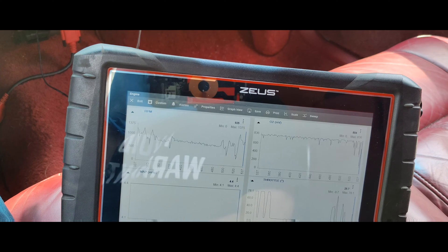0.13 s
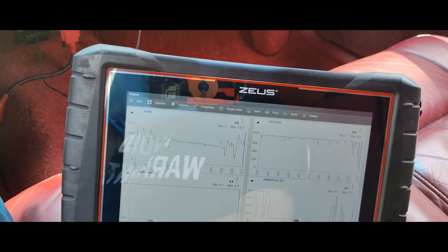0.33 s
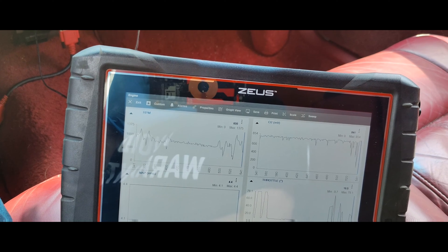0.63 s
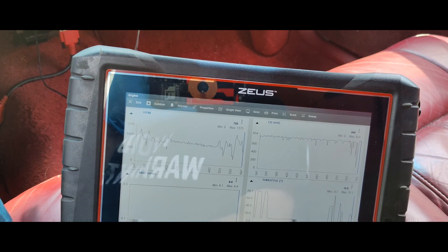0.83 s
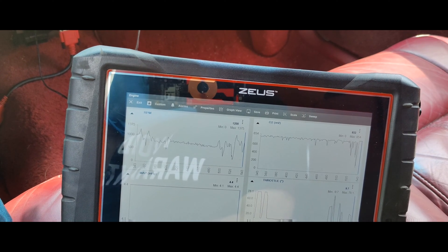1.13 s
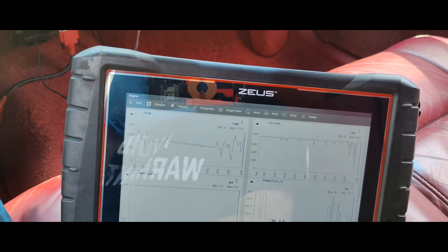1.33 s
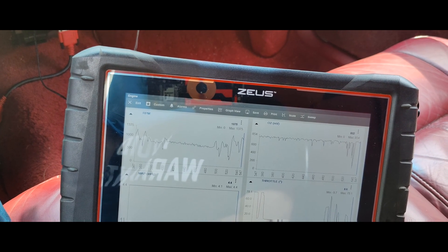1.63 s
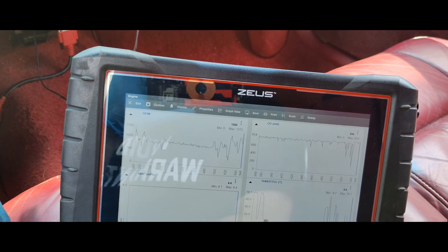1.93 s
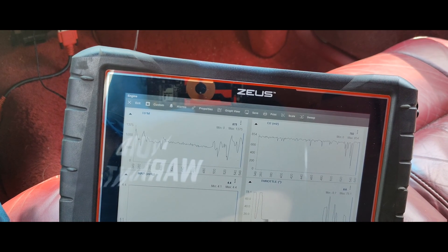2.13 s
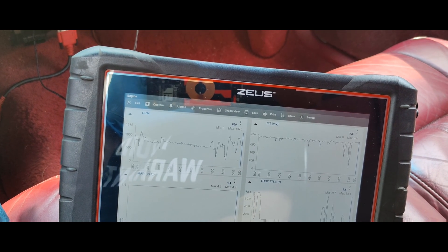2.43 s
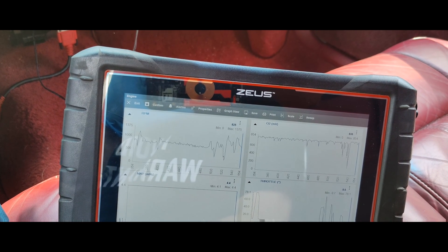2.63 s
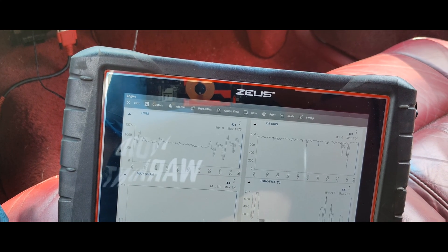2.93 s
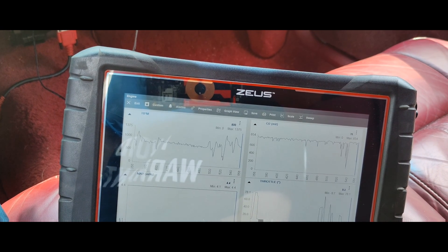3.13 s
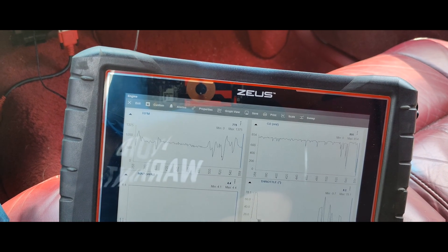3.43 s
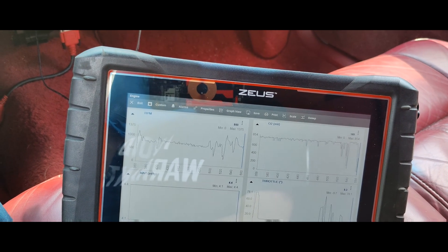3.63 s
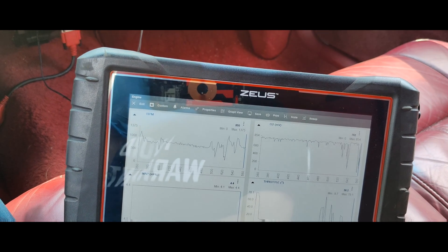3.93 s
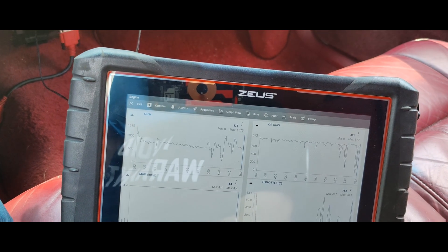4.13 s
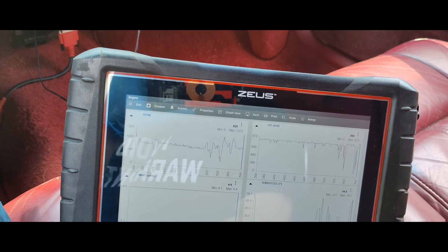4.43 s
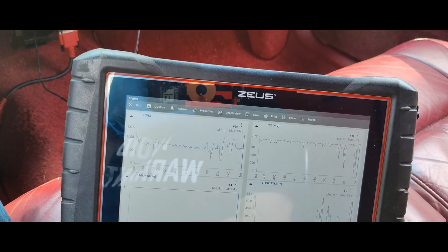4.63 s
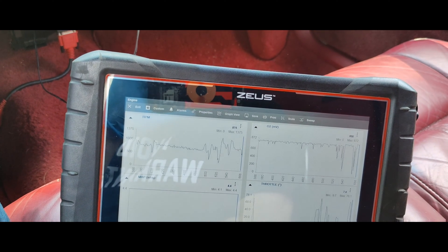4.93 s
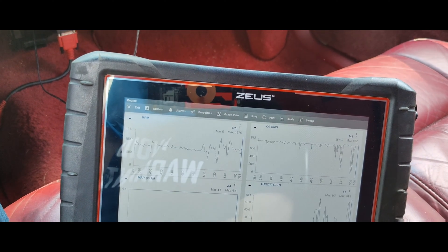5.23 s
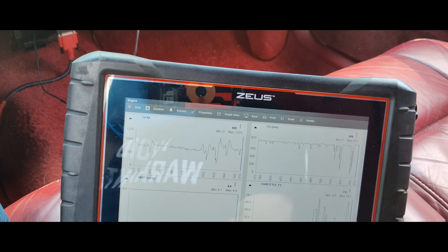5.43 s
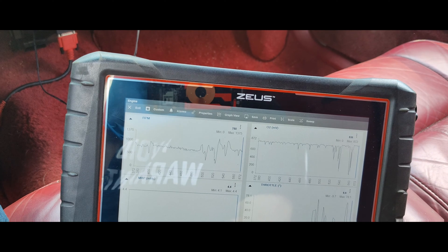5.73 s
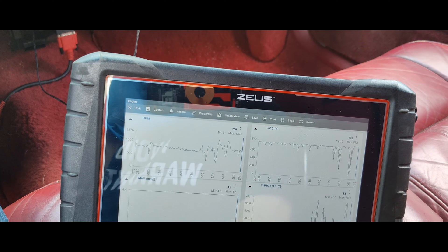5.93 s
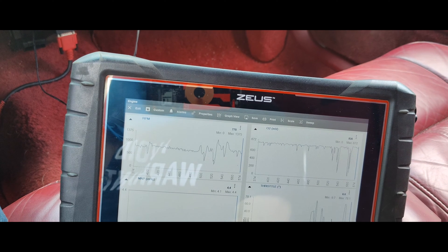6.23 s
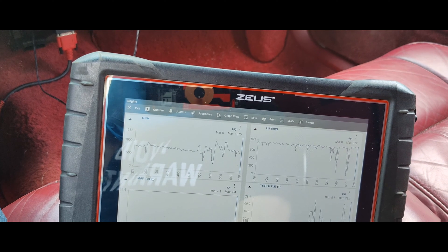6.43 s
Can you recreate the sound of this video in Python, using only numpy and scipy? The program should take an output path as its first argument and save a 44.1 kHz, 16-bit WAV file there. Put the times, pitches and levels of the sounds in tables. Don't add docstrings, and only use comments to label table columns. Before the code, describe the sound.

Inside a closed car, a large eight-cylinder petrol engine booms deeply and roughly, sagging nearly to a stall within half a second. It kicks, catches and revs up slightly, then settles to a quiet, lumpy idle. Past the middle it surges loudly for under a second, stumbles and settles again. Low mechanical roar leans left, faint intake hiss lies ahead, a trim panel hums in spells and tiny trim pieces tick. Stereo microphone at the seat.

```python
import sys
import numpy as np
from scipy import signal
from scipy.fft import rfft, irfft
from scipy.io import wavfile
from scipy.ndimage import uniform_filter1d

SR = 44100
rng = np.random.default_rng(int(sys.argv[2]) if len(sys.argv) > 2 else 0)


def boost_factor(decibels):
    exponent = np.asarray(decibels, float) / 20
    return 10 ** exponent


def store_wav(level_fs):
    pcm = np.round(np.clip(np.atleast_2d(level_fs), -1, 1) * 32767)
    wavfile.write(sys.argv[1], SR, pcm.T.astype(np.int16))


N = 289737
T = np.arange(N) / SR


def evened(x):
    return x / np.sqrt(np.mean(x ** 2) + 1e-20)


def smoothed(x, size):
    return uniform_filter1d(uniform_filter1d(x, size=size), size=size)


def read(points, hz):
    f, value = np.transpose(points)
    return np.interp(np.log(hz + 1), np.log(f + 1), value)


def curves(rows):
    s, *columns = np.transpose(rows)
    return [np.interp(T, s, column) for column in columns]


def bump(s, length):
    return np.exp(-((T - s) / length * 2) ** 2)


def gate(s, length, edge_s):
    return np.clip(np.minimum(T - s, s + length - T) / edge_s + .5, 0, 1)


def ports(x, lead_s, left_db):
    late = np.interp(T - lead_s, T, x)
    return np.array([x * boost_factor(left_db / 2), late / boost_factor(left_db / 2)])


# (time [s], firing rate [Hz])
SPEED = [(0, 65.4), (.3, 42.08), (.6, 27.74), (.82, 51.17), (.93, 46.92), (1.15, 52.73), (1.32, 71.76),
         (1.48, 76.6), (2.0, 61.53), (2.45, 56.28), (3.64, 55.48), (3.92, 60.18), (4.32, 51.9),
         (4.55, 44.36), (4.88, 61.47), (5.36, 55.68), (5.6, 51), (6.57, 49.94)]


def crank():
    hz, = curves(SPEED)
    turns = np.cumsum(hz) / SR
    weak_s = 2.545
    return hz, turns - turns[round(weak_s * SR)]


# (time [s], force [dB], sharpness of each push [dB], unevenness of cylinders [dB])
LOAD = [(0, -21, -8.5, -42), (.11, -17, -14.5, -29.5), (.27, -28, -4.5, -24.5), (.46, -30.5, -5.5, -30.5),
        (.68, -30.5, -6, -34.5), (.99, -44, -3, -32), (1.5, -41, -2, -32.5), (1.72, -32, -22, -33),
        (3.6, -33, -25, -32), (3.66, -16.5, -12.5, -28), (3.92, -15, -17, -26.5), (4.33, -16.5, -6, -30.5),
        (4.41, -21, -20, -27), (4.55, -33, -11, -32), (4.88, -34, -18, -31), (5.36, -36.5, -22, -31.5),
        (5.56, -28, -17, -37.5), (6.57, -30, -30, -33)]
# (time [s], length [s], force [dB])
CATCHES = [
    (0.341, 0.072, -21.5),
    (0.738, 0.025, -22),
    (0.808, 0.041, -20),
    (0.916, 0.066, -21.5),
    (4.479, 0.042, -19),
    (4.628, 0.069, -24),
    (5.749, 0.12, -30.5),
    (6.148, .06, -28.5),
    (6.45, .1, -31),
]
# (time [s], length [s], dip [dB])
MISSES = [
    (3.761, .04, -3),
    (4.41, 0.039, -2.5),
    (4.56, 0.055, -21),
    (5.951, 0.083, -3.5),
    (6.305, .06, -5),
]


def firing():
    load_db, sharp_db, uneven_db = curves(LOAD)
    power = boost_factor(2 * load_db)
    power = power + sum(boost_factor(2 * db) * bump(s, length) for s, length, db in CATCHES)
    dips_db = sum(db * bump(s, length) for s, length, db in MISSES)
    return 10 * np.log10(power) + dips_db, load_db + sharp_db, uneven_db


# (multiple of firing rate [times], level under the octave [dB], phase [rad])
OVERTONES = [(2, 0, 2.3), (3, -12, -.7)]


def boom(turns, boom_db, octave_db):
    wave = boost_factor(boom_db) * np.cos(2 * np.pi * turns)
    for k, db, phase in OVERTONES:
        wave += boost_factor(octave_db + db) * np.cos(2 * np.pi * k * turns + phase)
    return np.sqrt(2) * wave


def orders(hz, turns, level_db, pattern, colour, steady, spread, count, size):
    hz, turns = hz[::20], turns[::20]
    k = np.arange(1, count + 1)[:, None]
    a, b = evened(smoothed(rng.standard_normal((2, count, len(hz))), size))
    start = -np.exp(1j * spread * rng.standard_normal((count, 1)))
    wander = steady * start + (1 - steady) * (a + 1j * b)
    strength = boost_factor(np.take(pattern, k, mode="wrap") + read(colour, k * hz / 8)) * np.sqrt(hz)
    tones = (strength * wander * np.exp(2j * np.pi * k * turns / 8)).real
    return boost_factor(level_db) * evened(signal.resample_poly(tones.sum(0), 20, 1)[:N])


LOPE = [-12, -8, -7, 0, -1, -2, -9, -2]
# (frequency [Hz], level [dB])
CABIN = [(14, -28), (22, -11), (28, 4.5), (34, -1), (42, 8.5), (52, 5.5), (64, -4), (82, -0.5),
         (100, -14.5), (148, -3.5), (185, -27), (300, -19.5), (600, -74)]


def lope(hz, turns, uneven_db):
    return orders(hz, turns, uneven_db, LOPE, CABIN, steady=.8, spread=.9, count=56, size=500)


RASP = [0, -14, -13, -12, -3, -12, -13, -14]
# (frequency [Hz], level [dB])
GROWL = [(60, -36), (90, -8), (185, 7), (260, -2), (400, -6), (650, -13), (800, -42)]


def rasp(hz, turns, boom_db):
    level_db = uniform_filter1d(boom_db, size=3000) * 1.7 - 6.5
    return orders(hz, turns, level_db, RASP, GROWL, steady=.85, spread=3, count=104, size=320)


# (frequency [Hz], lead [rad])
LEAD = [(30, 0), (520, .6), (950, 1.1), (1210, 3.0), (1720, 3.9), (1980, 6.4), (2240, 6.1), (2580, 7.5),
        (2930, 6.2), (4650, 6.5), (5250, 7.1), (5860, 5.6), (6630, 6.3)]


def noise(spectrum, modes, same, left, ripple_db, patchy_db, flicker_db):
    frames, hz = N // 256 + 5, np.fft.rfftfreq(1024, 1 / SR)
    a, b, c, d, patches = rng.standard_normal((5, len(hz), frames))
    patches = uniform_filter1d(uniform_filter1d(patches, size=10, axis=0), size=9, axis=1)
    patches = evened(patches)
    like = np.clip(read(same, hz), 0, 1)[:, None]
    first = a + 1j * b
    shared = like * first * np.exp(-1j * read(LEAD, hz))[:, None]
    second = shared + np.sqrt(1 - like ** 2) * (c + 1j * d)
    tilt = boost_factor(read(left, hz) / 2)[:, None]
    pair = np.array([first * tilt, second / tilt]) * boost_factor(patchy_db * patches)
    x = signal.istft(pair, nperseg=1024, noverlap=768)[1][:, :N]
    fine = np.fft.rfftfreq(N, 1 / SR)
    rings_db = sum(db / (1 + (2 * (fine - f) / width) ** 2) for f, width, db in modes)
    both, one, other = smoothed(rng.standard_normal((3, len(fine))), 150)
    rings_db = rings_db + ripple_db * evened(both + 0.16 * np.array([one, other]))
    coloured = irfft(rfft(x) * boost_factor(read(spectrum, fine) + rings_db), N)
    flicker = evened(uniform_filter1d(rng.standard_normal(N), size=900))
    return evened(coloured) * boost_factor(flicker_db * flicker)


# (time [s], level [dB])
AIRFLOW = [(0, -48), (.12, -48), (.33, -55), (.75, -53.5), (.92, -49), (1.2, -50.5), (2.0, -52),
           (2.6, -53.7), (3.75, -53), (3.93, -49), (4.3, -50), (4.45, -52), (4.52, -53), (5.4, -53.5),
           (5.62, -55), (6.57, -55)]


def airflow():
    level_db, = curves(AIRFLOW)
    return level_db + 53.5


# (frequency [Hz], level per Hz [dB])
ROAR = [(30, -25), (60, -0.5), (90, -2), (113, -7.5), (155, -2.5), (229, -22), (321, -13), (421, -19),
        (740, -19), (1040, -16.5), (1300, -23.5), (2040, -25), (2400, -33.5), (4200, -53.5)]
# (frequency [Hz], width [Hz], lift [dB])
ROAR_MODES = [(503, 22, 4), (528, 25, 5), (650, 90, 2.5), (1010, 50, 4), (1120, 70, 5), (1200, 40, 2),
              (1380, 30, 3), (1480, 30, 3), (1590, 40, 3), (1690, 35, 5), (1795, 60, 4), (2030, 70, 3),
              (2650, 80, 5)]
# (frequency [Hz], left-right likeness [0 to 1])
ROAR_SAME = [(100, .93), (250, .76), (500, .8), (1000, .56), (2000, .68), (4000, .65)]
# (frequency [Hz], left over right [dB])
ROAR_LEFT = [(150, 0), (380, 1.5), (700, 3.5), (1280, 5), (2370, 1.5), (4000, 3)]
# (start [s], length [s], dip [dB])
STALLS = [
    (0.35, 0.266, -2.5),
    (4.5, .11, -3),
    (3.3, .06, -1.5),
]


def roar(air_db, throb):
    early_db = np.interp(T + 0.099, T, air_db)
    level_db = -43.5 + 0.83 * early_db
    level_db = level_db + sum(db * gate(s, length, 0.043) for s, length, db in STALLS)
    sound = noise(ROAR, ROAR_MODES, ROAR_SAME, ROAR_LEFT, ripple_db=1.1, patchy_db=1.2, flicker_db=.5)
    return boost_factor(level_db + 6.5 + 0.16 * throb) * sound


# (frequency [Hz], level per Hz [dB])
HISS = [(1650, -4), (2800, -21), (3300, -15), (4230, -13.5), (4740, -9), (6040, -10.5), (6820, -3.5),
        (7920, -3), (9460, -10), (12000, -17), (13300, -19.5)]
# (frequency [Hz], level [dB])
HISS_TOP = [(13300, 0), (15000, -4), (15500, -8)]
# (frequency [Hz], width [Hz], lift [dB])
HISS_MODES = [(4620, 60, 4), (5130, 40, 3), (5740, 60, 3), (6325, 35, 5), (7250, 40, 4.5), (7655, 45, 5.5),
              (7855, 35, 5), (7985, 35, 3.5), (8125, 70, 5), (8290, 90, -4), (8880, 120, 3),
              (9150, 200, -3), (10300, 300, 2)]
# (frequency [Hz], left-right likeness [0 to 1])
HISS_SAME = [(3000, .55), (7000, .68), (9500, .76), (11000, .9), (12500, .82), (14000, .9)]
# (frequency [Hz], left over right [dB])
HISS_LEFT = [(100, 0), (9000, 0)]


def hiss(air_db, throb):
    treble = list(HISS) + [(hz, db + HISS[-1][1]) for hz, db in HISS_TOP[1:]]
    sound = noise(treble, HISS_MODES, HISS_SAME, HISS_LEFT, ripple_db=1.3, patchy_db=1.3, flicker_db=.6)
    top = signal.sosfiltfilt(signal.butter(2, 10500, "high", fs=SR, output="sos"), sound)
    sound = sound + (boost_factor(.7 * air_db) - 1) * top
    return boost_factor(air_db - 53.5 + 2.18 + 0.13 * throb) * sound


# (start [s], length [s], level [dB])
HUMS = [
    (0, 0.12, -48),
    (0.766, 0.09, -46.5),
    (0.935, 0.34, -49.5),
    (1.338, 0.17, -43.5),
    (1.72, .15, -53),
    (2.21, .3, -48),
    (2.577, .45, -45),
    (3.33, 0.4, -44.5),
    (3.9, 0.31, -58),
    (5.05, 0.43, -50),
]


def panel():
    on = sum(boost_factor(db) * gate(s, length, .03) for s, length, db in HUMS)
    flutter = evened(smoothed(rng.standard_normal(N), 1500))
    level_db = 20 * np.log10(on + boost_factor(-62)) + 3 * flutter
    drift = evened(smoothed(rng.standard_normal(N), 6000))
    waver = evened(uniform_filter1d(rng.standard_normal(N), size=3000))
    hz = 320 + 2 * drift + 2.2 * waver
    return np.sqrt(2) * boost_factor(level_db - 4) * np.sin(2 * np.pi * np.cumsum(hz) / SR)


# (time [s], peak level [dB], time to die by 60 dB [s])
TICKS = [
    (.6352, -32.5, .05),
    (.7064, -38, .03),
    (1.8994, -35.5, .06),
    (3.7794, -43, .03),
    (5.1915, -43, .04),
]


def ticks():
    out, t = np.zeros(N), np.arange(4000) / SR
    for s, db, t60 in TICKS:
        snap = 1 + np.exp(-t / 0.002)
        burst = rng.standard_normal(4000) * boost_factor(db - 9.5 - 60 * t / t60) * snap
        part = out[round(s * SR):][:4000]
        part += burst[:len(part)]
    bright = signal.sosfilt(signal.butter(2, [4500, 12000], "band", fs=SR, output="sos"), out)
    body = signal.sosfilt(signal.butter(1, [700, 2400], "band", fs=SR, output="sos"), out)
    return bright + 1.76 * body


def scene():
    hz, since_weak = crank()
    turns = since_weak + .5
    boom_db, octave_db, uneven_db = firing()
    beat = boom(turns, boom_db, octave_db)
    beat = beat + lope(hz, since_weak, uneven_db) + rasp(hz, since_weak, boom_db)
    throb = np.cos(2 * np.pi * turns)
    air_db = airflow()
    mix = ports(beat, lead_s=0.00029, left_db=.1)
    mix = mix + roar(air_db, throb) + hiss(air_db, throb)
    mix = mix + ports(panel(), lead_s=0.00012, left_db=1.0)
    return mix + ticks()


def top_cut(x):
    return signal.sosfilt(signal.butter(12, 15500, fs=SR, output="sos"), x)


def record(dry):
    miked = signal.sosfilt(signal.butter(2, 14, "high", fs=SR, output="sos"), dry)
    return top_cut(miked)


dry = scene()
out = record(dry)
store_wav(out)
```